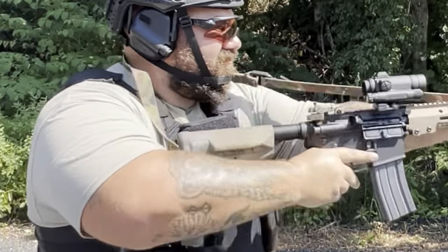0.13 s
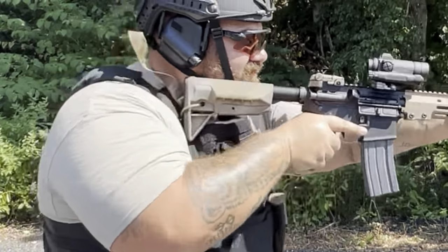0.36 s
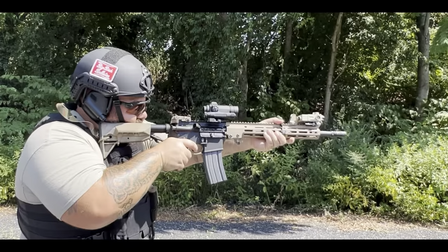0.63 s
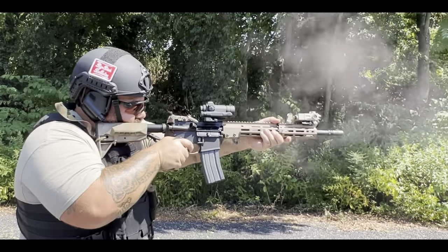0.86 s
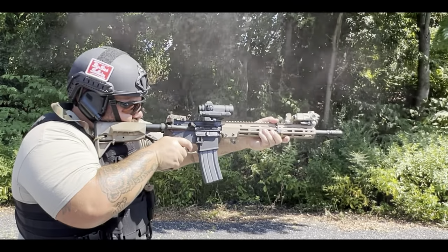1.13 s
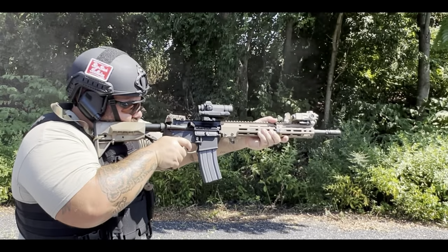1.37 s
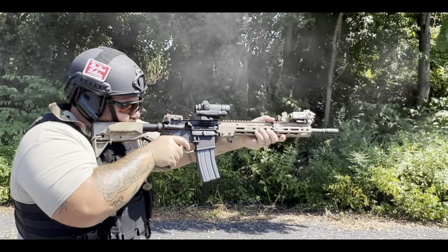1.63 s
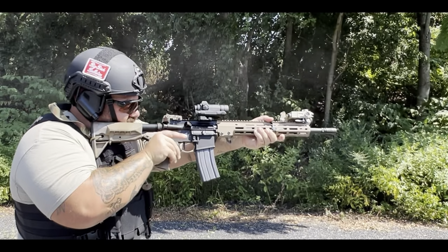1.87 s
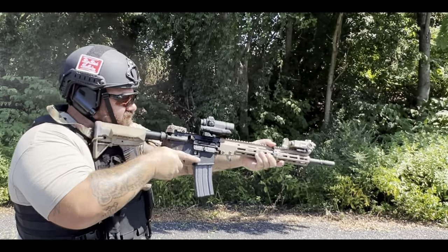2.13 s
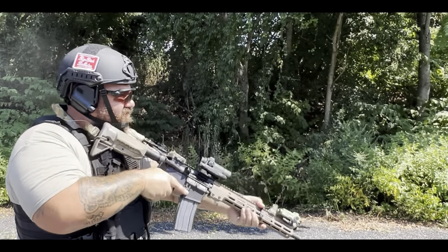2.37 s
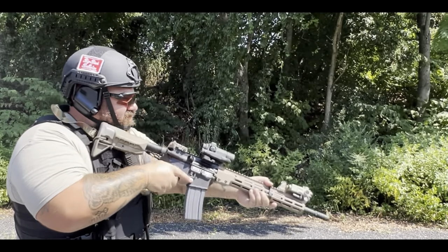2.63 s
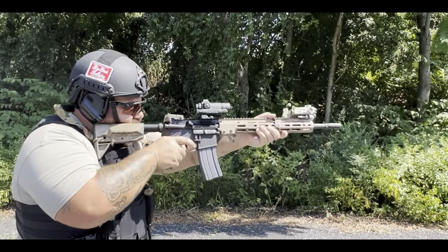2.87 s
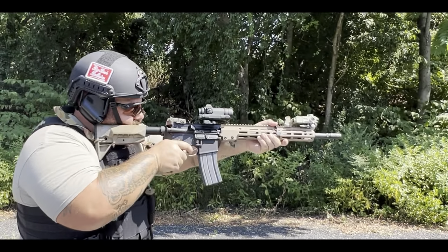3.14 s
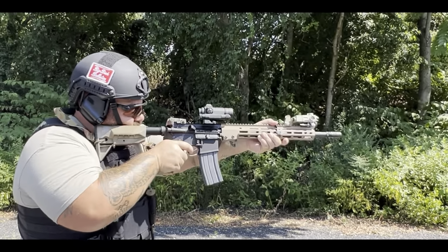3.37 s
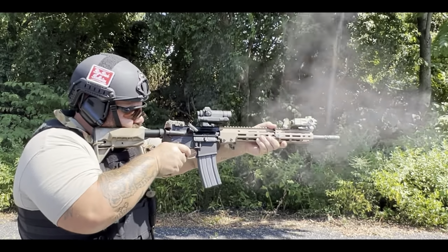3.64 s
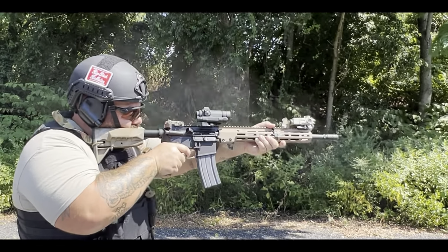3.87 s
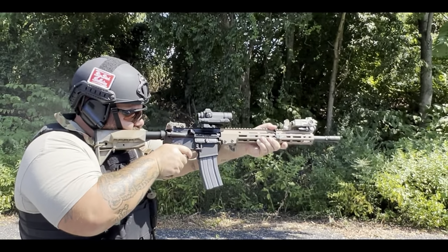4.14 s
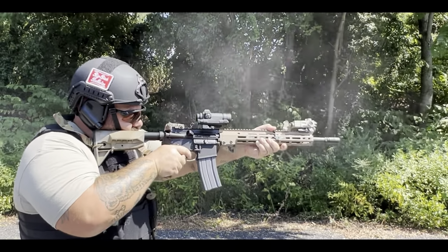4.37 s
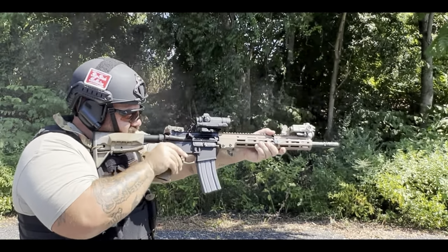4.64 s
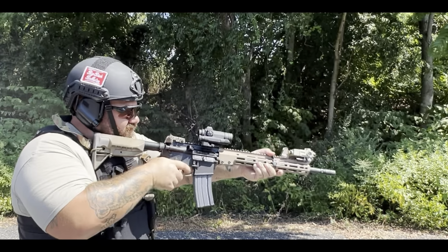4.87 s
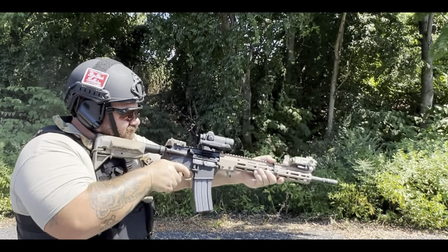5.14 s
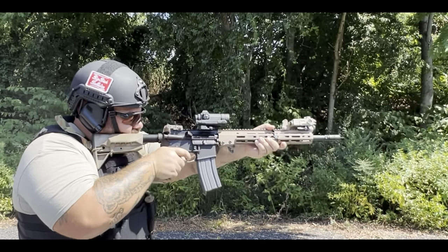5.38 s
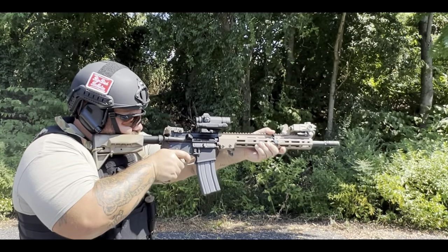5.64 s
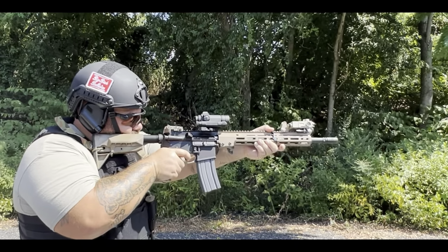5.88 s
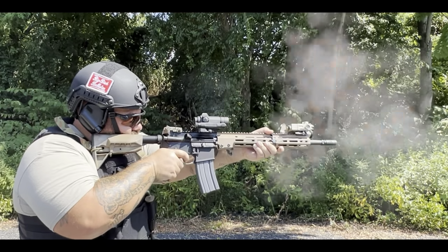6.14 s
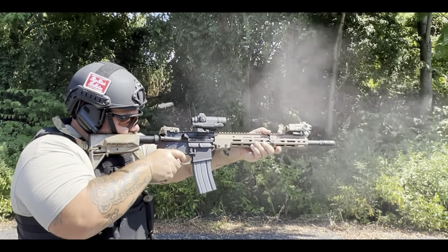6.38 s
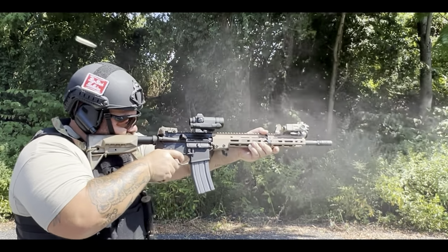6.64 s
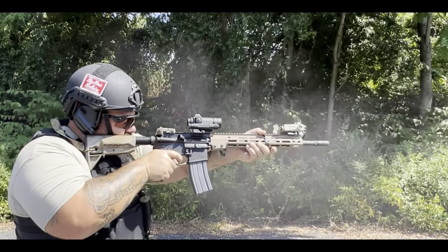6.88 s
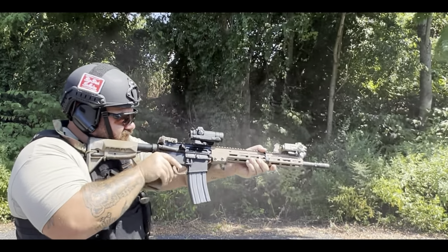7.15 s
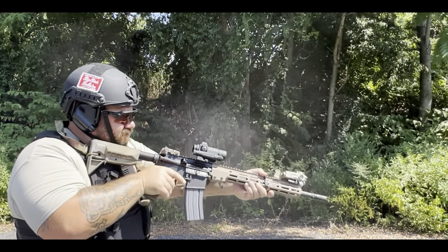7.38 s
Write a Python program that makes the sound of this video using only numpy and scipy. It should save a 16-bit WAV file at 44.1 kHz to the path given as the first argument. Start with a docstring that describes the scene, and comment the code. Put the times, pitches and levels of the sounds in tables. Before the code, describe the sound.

Eight sharp rifle shots outdoors, two spaced pairs then a quick run of four, each striking a steel plate and echoing off woods.

```python
"""Rifle fire at a steel plate

A rifle fires eight shots at a steel plate beside a wood; the muzzle is right of a small stereo microphone. Each
shot brings shock pulses and filtered gas noise, and a low swing falling in pitch follows; bushes, trunks and
the far wood return it as swelling, decaying noise. The plate answers with a knock and splash from the left and
a hum of damped modes; brass tinkles on gravel, also by damped modes. Shaped noise gives the wind thumping on
the microphone's two ports, the hiss of leaves and insects and short clicks, most from the shooter's gear."""
import sys
import numpy as np
from scipy import signal
from scipy.fft import rfft, irfft, next_fast_len
from scipy.io import wavfile
from scipy.ndimage import uniform_filter1d, map_coordinates

SR = 44100
rng = np.random.default_rng(int(sys.argv[2]) if len(sys.argv) > 2 else 0)


def gain_from_decibels(decibels):
    """Convert decibel values to linear amplitude factors."""
    exponent = np.asarray(decibels, float) / 20
    return 10 ** exponent


def persist_wave(psi):
    """Save psi, clipped to +-1, as 16-bit WAV."""
    counts = np.round(np.clip(psi, -1, 1) * 32767).astype(np.int16)
    wavfile.write(sys.argv[1], SR, np.atleast_2d(counts).T)


N = 331632  # length in samples
PORT_LAG = .0002  # the right port hears diffuse sound later than the left (s)

# Likeness of the two ports. Each row: frequency in Hz, left-right correlation.
PORT_LIKENESS = [(100, .5), (300, .45), (700, -.1), (2000, -.2), (6500, .1), (7600, .85), (15000, .9)]
# Steady buffeting between gusts. Each row: time in seconds, level in dB.
BREEZE = [(0, -48), (.85, -46.5), (1.9, -61), (3.0, -65), (3.6, -59.5), (4.7, -56), (5.3, -63), (6.1, -71),
          (7.52, -70)]
# Gusts on the ports. Each row: middle in seconds, half length in seconds, level in dB,
# scuffing edge in dB relative to the thump.
GUSTS = [(0.107, .02, -40, -21), (0.245, .035, -30.5, -15.5), (.355, .015, -37, -32),
         (0.484, .04, -38, -16), (.735, .03, -35.5, -11.5), (0.819, 0.027, -39, -21),
         (2.068, 0.033, -50, -15), (2.19, 0.036, -48.5, -12), (2.479, 0.049, -54, -15.5),
         (2.604, 0.034, -48, -18), (2.785, .06, -50, -19), (3.094, 0.041, -54, -4.5),
         (3.238, .07, -49.5, -7), (3.5, .045, -56, -5), (4.778, .015, -42, -23), (4.65, .05, -46.5, -9),
         (4.924, .07, -50.5, -3.5), (5.13, .05, -50, -9), (5.262, .03, -55, -8), (5.47, 0.071, -51, -17),
         (5.662, 0.05, -56.5, -18.5), (5.8, .03, -56, -27), (5.902, 0.031, -61, -23),
         (7.368, 0.055, -47, -1.5), (7.449, .02, -49, -4)]
# Spectrum of the wind's thump. Each row: frequency in Hz, relative level in dB per Hz.
BUFFET_TONE = [(15, -36.5), (25, -12.5), (69, -0.5), (147, -0.5), (325, -16), (395, -30.5), (461, -41.5),
               (700, -40), (910, -74.5), (1540, -120)]
# Spectrum of eddies at a port. Each row: frequency in Hz, relative level in dB per Hz.
EDDY_TONE = [(100, -22), (250, 5), (600, -7.5), (1200, -27), (2000, -42.5), (4000, -91)]
# Hiss of the leaves. Each row: time in seconds, level in dB.
LEAVES = [(0, -51.5), (.86, -55), (2.5, -82), (3.6, -73.5), (5.5, -83), (7.52, -74.5)]
# Spectrum of the leaves, with an insect band near the top.
# Each row: frequency in Hz, relative level in dB per Hz.
LEAF_TONE = [(180, -35), (300, -6.5), (336, -13.5), (800, -26), (2130, -29), (4120, -37), (6170, -33.5),
             (7010, -39), (7850, -25.5), (9670, -51.5), (10500, -61.5), (11500, -54.5), (14000, -76)]
# Eddies bursting on a port. Each row: time in seconds, relative level in dB, left minus right in dB.
POPS = [(0.721, -37.5, -0.5), (3.078, -53, -0.5), (3.114, -43.5, -2.5), (3.169, -47, -5), (3.189, -48, -9),
        (3.206, -47.5, -0.5), (3.238, -45, -8), (3.254, -49.5, -2.5), (3.301, -50.5, -3),
        (3.459, -52, -1.5), (3.497, -48.5, 2), (3.538, -53, -3), (4.189, -33.5, -2.5), (4.771, -40, -9),
        (5.468, -65, -5)]
# Short clicks, the first at the very start. Each row: start in seconds, relative level in dB, centre in Hz,
# left minus right in dB.
CLICKS = [(0.003, -30, 1430, -0.5), (0.028, -39, 1100, 4), (0.05, -42, 1170, -18), (0.081, -44, 1130, -5),
          (0.283, -48, 1620, -5.5), (0.43, -47, 860, 0.5), (0.485, -42.5, 984, -0.5), (2.88, -46, 6460, -5),
          (2.954, -69, 1190, -2)]
# Spent brass landing. Each row: start in seconds, relative level in dB, left minus right in dB.
CASES = [(1.8492, -57, -4.5), (2.35, -63, 2), (5.1505, -75, 1), (7.0594, -72, 8), (7.2175, -83, 9),
         (7.4155, -64, 0)]
# Modes of a brass case. Each row: frequency in Hz, relative level in dB, 60 dB decay in seconds.
BRASS_MODES = [(8800, -27, 0.088), (10980, 1, 0.16), (14850, -11, 0.24)]
# Tones swelling into the first shot. Each row: frequency in Hz, end in seconds, swell in seconds,
# left level in dB, right level in dB.
SWELLING_TONES = [(365, .8742, .005, 2, -7), (300, .865, .005, -9, -17), (6500, .8735, .0025, -40, -3),
                  (6300, .869, .008, -45, -13), (5500, .868, .008, -45, -17), (3300, .872, .01, -45, -25),
                  (2400, .872, .01, -40, -27)]
# The shots. Each row: start in seconds, blast level in dB, plate level in dB, far echo level in dB,
# far echo swell in seconds.
SHOTS = [(0.8761, 2.5, -15, -19.5, 0.2), (1.4615, 1.5, -19.5, -36, 0.054),
         (3.652, -0.5, -13.5, -26.5, 0.11), (4.2335, 2, -13.5, -32.5, 0.035), (6.1545, 2, -13, -37, 0.11),
         (6.3296, 1.5, -13, -29, 0.13), (6.5171, 2, -17.5, -30.5, 0.18), (6.6810, 3, -16, -36, 0.073)]
# Spectrum of the bushes' echo. Each row: frequency in Hz, relative level in dB per Hz.
BUSH_TONE = [(150, -15), (800, -12), (2500, -7.5), (4000, -8.5), (6400, -2), (7200, -7), (9300, -10),
             (11500, -15), (16500, -18.5)]
# Balance of the bushes' echo. Each row: frequency in Hz, left minus right in dB.
BUSH_PAN = [(150, -17), (700, -10), (2500, -15.5), (5000, -24), (6900, -22), (7600, -2), (12000, -1)]
# Spectrum of the trunks' echo. Each row: frequency in Hz, relative level in dB per Hz.
TRUNK_TONE = [(100, -19.5), (250, -11.5), (500, -0.5), (1200, -8), (2500, -13), (4200, -15), (6500, -15),
              (7500, -26), (12000, -20.5), (16500, -48)]
# Balance of the trunks' echo. Each row: frequency in Hz, left minus right in dB.
TRUNK_PAN = [(150, -10.5), (700, -10.5), (2000, -14), (5000, -21), (6900, -24), (7600, -2), (12000, -2.5)]
# Spectrum of the far side's echo. Each row: frequency in Hz, relative level in dB per Hz.
SIDE_TONE = [(100, -17.5), (600, -3), (2000, -8), (4000, -11), (6500, -11.5), (9000, -15.5), (11500, -24),
             (16500, -39.5)]
# Balance of the far side's echo. Each row: frequency in Hz, left minus right in dB.
SIDE_PAN = [(200, 2), (1000, -1.5), (3000, -0.5), (6000, -4), (10000, 1.5)]
# Spectrum of the far wood's echo. Each row: frequency in Hz, relative level in dB per Hz.
WOOD_TONE = [(35, -30), (60, -2), (240, -7.5), (350, -12), (586, -5.5), (4320, -15), (5870, -6),
             (9610, -25), (10300, -39), (12200, -18), (15400, -48.5), (16500, -62.5)]
# Balance of the echoes from wood, bank and far off. Each row: frequency in Hz, left minus right in dB.
WOOD_PAN = [(100, 0.5), (700, -2), (2500, -1.5), (4500, -5.5), (6800, -13), (7600, 0), (12000, -0.5)]
# Decay of the far wood's echo. Each row: frequency in Hz, 60 dB decay in seconds.
WOOD_DECAY = [(200, 1.59), (1000, 1.61), (3000, 1.63), (7000, 1.33), (10000, 1.24), (15000, 0.77)]
# Spectrum of the slap from a distant bank. Each row: frequency in Hz, relative level in dB per Hz.
BANK_TONE = [(100, -10), (220, 0.5), (500, -1.5), (1500, -13), (3500, -12), (7000, -18), (12000, -35.5)]
# Spectrum of the late answer from far off. Each row: frequency in Hz, relative level in dB per Hz.
HILL_TONE = [(300, -20), (1400, 14), (2100, 28), (2800, 2), (3400, -31), (6000, -30), (10000, -60)]
# Spectrum of bullet on steel. Each row: frequency in Hz, relative level in dB per Hz.
STRIKE_TONE = [(88, -40.5), (150, -17), (2130, -7), (3770, -28.5), (7080, -7.5), (9330, -18), (10500, -39),
               (11600, -16.5), (13000, -13), (16500, -36.5)]
# Modes of the steel plate. Each row: frequency in Hz, relative level in dB, 60 dB decay in seconds.
PLATE_MODES = [(2400, -15, 1.3), (4790, -14.5, 1.3), (5733, -5.5, 1.0), (6650, -17, 1.3), (7375, 0, .55),
               (8290, -5, .5), (8830, -6, .5), (9335, -3, .42), (11300, -10, .3), (11840, -8, .4),
               (12400, -11, .4), (13130, -3, .22), (13330, -3, .24), (15180, -8, .25)]
# Arrivals of the blast off ground, gun and shooter. Each row: nominal delay in seconds,
# pulse length in seconds, nominal left level in dB, nominal right level in dB.
ARRIVALS = [(0, 0.00015, -9.5, 4.5), (.0019, 0.00025, -17, 2), (.0041, 0.0001, -13.5, -1.5),
            (.0062, 0.0002, -14, -7), (.0085, .0003, -11.5, -5), (0.013, 0.0007, -11, -9),
            (0.015, 0.0022, -13.5, -11)]
# Spectrum of the escaping gas. Each row: frequency in Hz, relative level in dB per Hz.
GAS_TONE = [(35, -28.5), (60, -12), (264, -3.5), (1810, -10), (3670, -21), (6300, -12.5), (9170, -24.5),
            (10300, -25.5), (15400, -30), (16500, -42)]
# Balance of the escaping gas. Each row: frequency in Hz, left minus right in dB.
GAS_PAN = [(100, -4.5), (600, -5), (2500, -12), (5000, -19), (6900, -19), (7600, -3), (12000, 1.5)]
# Overall tone: little deep bass, two narrow gaps in the treble, little above 16 kHz.
# Each row: frequency in Hz, gain in dB.
OVERALL_TONE = [(20, -14), (45, 0), (9600, 0), (10000, -22), (10800, -22), (11100, 0), (13300, 0),
                (13600, -16), (14200, -16), (14500, 0), (15800, 0), (16100, -24), (17000, -40)]


def unit(x):
    """Normalisation to a root mean square of 1."""
    return x / np.sqrt(np.mean(x ** 2) + 1e-20)


def along(points, hz):
    """Interpolation of (Hz, value) points on a logarithmic frequency axis."""
    f, v = np.transpose(points)
    return np.interp(np.log(hz + 1), np.log(f + 1), v)


def sides(pan_db):
    """Level difference between channels: left and right gains in which only the far side is shaded."""
    return np.array([gain_from_decibels(np.minimum(pan_db, 0)), gain_from_decibels(-np.maximum(pan_db, 0))])


def add(out, s, sound):
    """Superposition: mixes a stereo sound in at a time in seconds."""
    spot = out[:, round(s * SR):][:, :sound.shape[1]]
    spot += sound[:, :spot.shape[1]]


def noise(length):
    """White Gaussian noise, independent in two channels."""
    return rng.standard_normal((2, length))


def paired(z, hz):
    """Spatial coherence: two unrelated noise spectra are made as alike as the ports hear them."""
    turn = np.arccos(np.clip(along(PORT_LIKENESS, hz), -1, 1)) / 2
    mid = np.cos(turn) * z[0]
    side = np.sin(turn) * z[1]
    lag = np.exp(-2j * np.pi * hz * PORT_LAG)
    return np.array([mid + side, (mid - side) * lag])


def coloured(x, tone, pan=((1, 0),)):
    """Spectral filtering of stereo noise, with a left-right balance; the louder side has rms 1."""
    m = next_fast_len(x.shape[1] + 2048)
    hz = np.fft.rfftfreq(m, 1 / SR)
    gains = gain_from_decibels(along(tone, hz)) * sides(along(pan, hz))
    y = irfft(paired(rfft(x, m), hz) * gains, m)[:, :x.shape[1]]
    return y / np.max(np.std(y, axis=1))


def ring(modes, t, spread_db, rough=0.):
    """Modal superposition of damped sines; strengths vary by channel, rough is a random drift of phase."""
    total = np.zeros((2, len(t)))
    for hz, db, t60 in modes:
        strength_db = db + rng.normal(0, spread_db, (2, 1))
        phase = rough * np.cumsum(rng.standard_normal(len(t)))
        total += gain_from_decibels(strength_db - 60 * t / t60) * np.sin(2 * np.pi * hz * t + phase)
    return total


def drift(t, rate):
    """Slow random modulation: a smooth curve through random values, rate of them per second."""
    return map_coordinates(rng.standard_normal(int(N * rate / SR) + 4), [t * rate])


def wind(t):
    """Turbulent pressure on the ports: a low thump and a scuffing edge, steady and in gusts."""
    lump_db, scuff_lump_db = 4, 5.5  # depth of the random level modulation
    breeze_edge_db = -15  # scuff of the steady breeze under its thump
    lean_db, wander_db = -2, 3.5  # left minus right, and its random drift
    lumps = np.array([drift(t, 16.0) for _ in range(2)])
    thump = unit(gain_from_decibels(lump_db * lumps) * coloured(noise(N), BUFFET_TONE))
    scuff = unit(gain_from_decibels(scuff_lump_db * drift(t, 110.0)) * coloured(noise(N), EDDY_TONE))
    breeze = gain_from_decibels(np.interp(t, *np.transpose(BREEZE)))
    strength = breeze.copy()
    edge = gain_from_decibels(breeze_edge_db) * breeze
    for middle, half, db, edge_db in GUSTS:
        puff = gain_from_decibels(db) * np.exp(-((t - middle) / half) ** 2)
        strength += puff
        edge += gain_from_decibels(edge_db) * puff
    return (strength * thump + edge * scuff) * sides(lean_db + wander_db * drift(t, 12.0))


def leaves(t):
    """Filtered broadband noise: the hiss of leaves and insects, with one stir of the leaves."""
    stir_s, swell, fade, stir_db = .28, .015, .04, -43  # s, s, s, dB
    stir = gain_from_decibels(stir_db) * np.exp(-np.maximum((stir_s - t) / swell, (t - stir_s) / fade))
    level = gain_from_decibels(np.interp(t, *np.transpose(LEAVES))) + stir
    return level * coloured(noise(N), LEAF_TONE)


def air():
    """Amplitude modulation of the background: wind and hiss together dip briefly."""
    dip_s, half, dip_db = .582, .011, -24  # s, s, dB
    t = np.arange(N) / SR
    return (wind(t) + leaves(t)) * gain_from_decibels(dip_db * np.exp(-((t - dip_s) / half) ** 2))


def eddy_pops():
    """Vortex impact: eddies burst on a port as low noise with a quick rise and an exponential decay."""
    out, t = np.zeros((2, N)), np.arange(SR // 3) / SR
    envelope = gain_from_decibels(-60 * t / 0.042) * (1 - np.exp(-t / 0.00084))
    for s, db, pan_db in POPS:
        eddy = coloured(noise(len(t)), EDDY_TONE) * envelope
        add(out, s - .001, gain_from_decibels(db + 6.5) * eddy * sides(pan_db)[:, None])  # begins 1 ms early
    return out


def clicks():
    """Impulsive excitation: each click is decaying noise peaked about a centre frequency."""
    out, t = np.zeros((2, N)), np.arange(SR // 3) / SR
    for s, db, hz, pan_db in CLICKS:
        tone = [(hz / 4, -18), (hz / 1.3, -8), (hz, 0), (hz * 1.32, -10), (hz * 4, -32), (hz * 9, -70)]
        click = coloured(noise(len(t)), tone)
        add(out, s, gain_from_decibels(db + 3.0 - 60 * t / 0.032) * click * sides(pan_db)[:, None])
    return out


def brass_cases():
    """Modal ringing of a struck shell: spent brass lands on gravel with a tick of noise and a tinkle."""
    out, t = np.zeros((2, N)), np.arange(SR // 3) / SR
    for s, db, pan_db in CASES:
        tinkle = ring(BRASS_MODES, t, spread_db=0)
        tick = 2.5 * gain_from_decibels(-60 * t / .008) * noise(len(t))
        add(out, s, gain_from_decibels(db + 1) * (tinkle + tick) * sides(pan_db)[:, None])
    return out


def swelling_tones():
    """Exponential growth of narrow tones, which stop short just before the first shot."""
    out, t = np.zeros((2, N)), np.arange(N // 4) / SR
    for hz, end, swell, left_db, right_db in SWELLING_TONES:
        before = np.maximum(end - t, 0)
        grow = np.exp(-before / swell - (before / .017) ** 6)
        stop = 1 / (1 + np.exp(np.clip((t - end) / .0008, -30, 30)))
        add(out, 0, gain_from_decibels([[left_db], [right_db]]) * grow * stop * np.sin(2 * np.pi * hz * (t - end)))
    return out


def echoes():
    """Diffuse reflection: every reflector adds its power, swelling and dying, to a patchy stereo noise."""
    hop = 64  # samples
    hz, t, z = signal.stft(noise(N), SR, nperseg=4 * hop, noverlap=3 * hop)
    z = paired(z, hz[:, None])
    power = np.zeros(z.shape)

    def add_echo(start, swell, t60, db, tone, pan):
        """Energy addition of one reflection; times in seconds."""
        age = np.maximum(t - start, 0)
        shape = unit(gain_from_decibels(along(tone, hz))) * sides(along(pan, hz))
        envelope = gain_from_decibels(db - 60 * age / t60) * (1 - np.exp(-(age / swell) ** 2))
        power[:] += (shape[..., None] * envelope) ** 2

    def field(high, long):
        """Random field smoothed over high bins and long frames."""
        rows = uniform_filter1d(rng.standard_normal(z.shape[1:]), size=high, axis=0)
        return unit(uniform_filter1d(rows, size=long, axis=1))

    wood_t60 = along(WOOD_DECAY, hz)[:, None]
    for s, _, _, far_db, far_swell in SHOTS:
        # bushes, trunks and the far side are near
        add_echo(s + .006, swell=.028, t60=.2, db=-8, tone=BUSH_TONE, pan=BUSH_PAN)
        add_echo(s + .042, swell=.009, t60=.19, db=-13.5, tone=TRUNK_TONE, pan=TRUNK_PAN)
        add_echo(s + .062, swell=.02, t60=.42, db=-21, tone=SIDE_TONE, pan=SIDE_PAN)
        # the far wood, a single slap from a bank, a late dull answer
        add_echo(s + .14, far_swell, wood_t60, far_db, WOOD_TONE, WOOD_PAN)
        add_echo(s + .272, swell=.008, t60=.12, db=-31, tone=BANK_TONE, pan=WOOD_PAN)
        add_echo(s + .93, swell=.14, t60=.9, db=-62, tone=HILL_TONE, pan=WOOD_PAN)
    patches_db = 2.0 * field(5, 6) + 1.3 * field(14, 30)  # single trees and whole stands answer louder
    patchy = z * np.sqrt(power) * gain_from_decibels(patches_db)
    return signal.istft(patchy, SR, nperseg=4 * hop, noverlap=3 * hop)[1][:, :N]


def plate():
    """Impact on a plate: the bullet gives a short knock, a splash of lead and the plate's modes."""
    plate_delay = .1467  # bullet out, sound back (s)
    knock_modes = [(2100, 11, .006), (1500, 8, .006), (450, -3, .015)]  # Hz, dB, 60 dB decay in s
    out, t = np.zeros((2, N)), np.arange(2 * SR) / SR
    for s, _, db, *_ in SHOTS:
        knock = ring(knock_modes, t, spread_db=1) * (1 - np.exp(-t / .0002))
        knock[0] = np.roll(knock[0], round(PORT_LAG * SR / 2))
        decay = gain_from_decibels(2.5 - 60 * t / 0.0065) + gain_from_decibels(-9.5 - 60 * t / 0.17)
        splash = decay * coloured(noise(len(t)), STRIKE_TONE)
        hum = gain_from_decibels(-23) * (1 - np.exp(-t / .01)) * ring(PLATE_MODES, t, spread_db=3, rough=.009)
        add(out, s + plate_delay, gain_from_decibels(db) * (sides(3)[:, None] * (knock + splash) + hum))
    return out


def shock_fronts(t):
    """Blast wave of suction, then push, arriving several times with random delay and level."""
    shot = np.zeros((2, len(t)))
    lucks = rng.normal(0, 1, (len(ARRIVALS), 3))
    for (delay, length, left_db, right_db), luck in zip(ARRIVALS, lucks):
        round_body = .00032 + .0002 * luck[2]  # extra delay to the left port (s)
        late = delay + .0002 * luck[0] * (delay > 0) + np.array([[round_body], [0]])
        u = np.maximum(t - late, 0) / length
        pulse = (1 - u) * np.exp(-u) * (1 - np.exp(-4 * u))
        shot -= gain_from_decibels([[left_db], [right_db]]) * gain_from_decibels(1.6 * luck[1]) * pulse
    return shot


def gas_burst(t):
    """Jet noise: escaping gas rises quickly, decays and shuts off."""
    shut_off = 1 / (1 + (t / 0.02) ** 6)
    burst = (1 - np.exp(-t / 0.00027)) * gain_from_decibels(-60 * t / 0.069) * shut_off
    return gain_from_decibels(-8) * burst * coloured(noise(len(t)), GAS_TONE, GAS_PAN)


def after_swing(t):
    """Frequency glide: a low swing after the shock, falling in pitch."""
    first_hz, last_hz, fall, length, boom_db = 480, 75, .0105, .018, -16.5  # Hz, Hz, s, s, dB
    turns = np.cumsum(last_hz + (first_hz - last_hz) * np.exp(-t / fall)) / SR
    turns = turns + np.array([[.15], [0]])  # left leads in phase
    envelope = t / length * np.exp(1 - t / length - (t / length) ** 2)
    return gain_from_decibels(boom_db) * np.sin(2 * np.pi * turns) * envelope * sides(-3.5)[:, None]


def blasts():
    """Superposition: shock fronts, gas and after-swing; a thin hiss swells just before each shot."""
    lead_db, lead_swell = -21, .0045  # dB, s
    lead = SR // 40  # samples
    out, t = np.zeros((2, N)), np.arange(SR // 8) / SR
    swell = np.exp(-t[:lead][::-1] / lead_swell)
    for s, db, *_ in SHOTS:
        add(out, s, gain_from_decibels(db) * (shock_fronts(t) + gas_burst(t) + after_swing(t)))
        hiss = coloured(noise(lead), GAS_TONE, GAS_PAN) * swell
        add(out, s - lead / SR, gain_from_decibels(db + lead_db) * hiss)
    return out


def scene():
    """Linear superposition of all the layers."""
    gunfire = blasts() + echoes() + plate()
    small_hits = clicks() + brass_cases() + eddy_pops()
    return gunfire + small_hits + swelling_tones() + air()


def top_cut(x):
    """Nothing passes above the cut-off."""
    return signal.sosfilt(signal.butter(12, 16960, fs=SR, output="sos"), x)


def record(dry):
    """Saturation and filtering: the input rounds off the highest peaks; the overall tone is then applied."""
    m = next_fast_len(N + 2048)
    rounded = dry / (1 + np.abs(dry / .95) ** 6) ** (1 / 6)
    response = gain_from_decibels(along(OVERALL_TONE, np.fft.rfftfreq(m, 1 / SR)))
    thinned = irfft(rfft(rounded, m) * response, m)[:, :N]
    return top_cut(thinned)


dry = scene()
out = record(dry)
persist_wave(out)
```